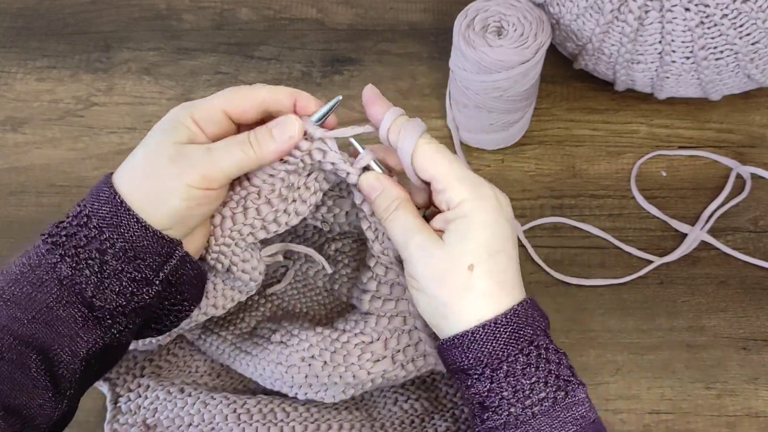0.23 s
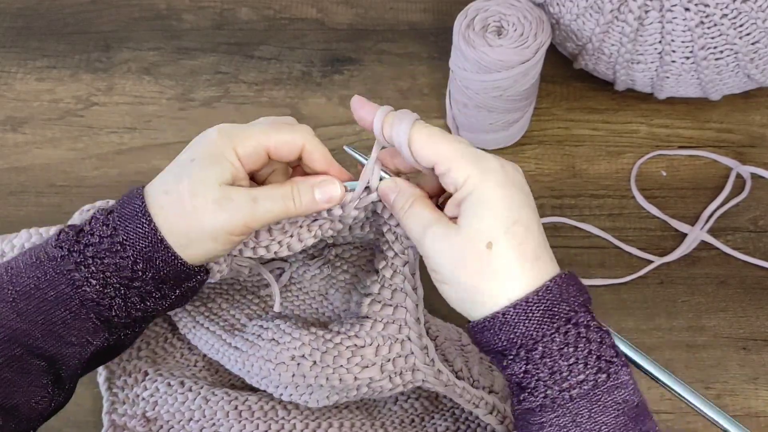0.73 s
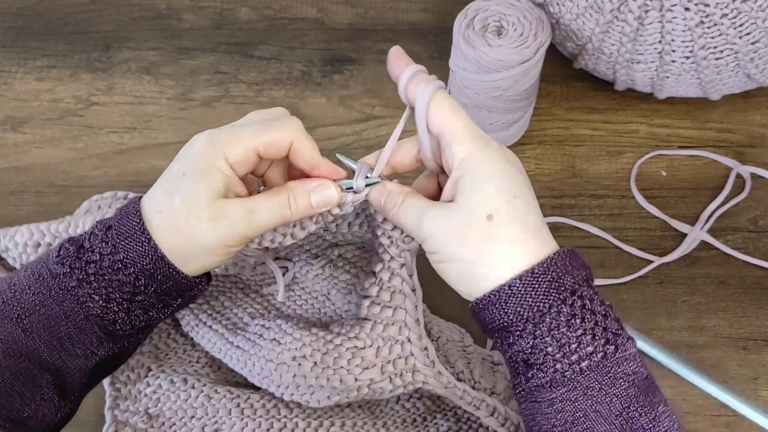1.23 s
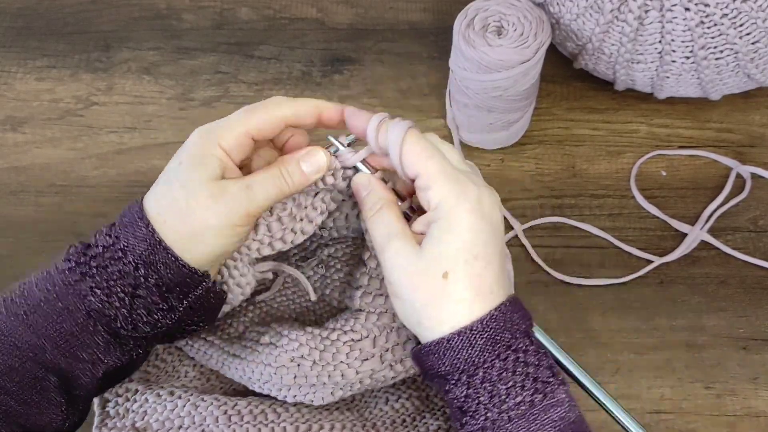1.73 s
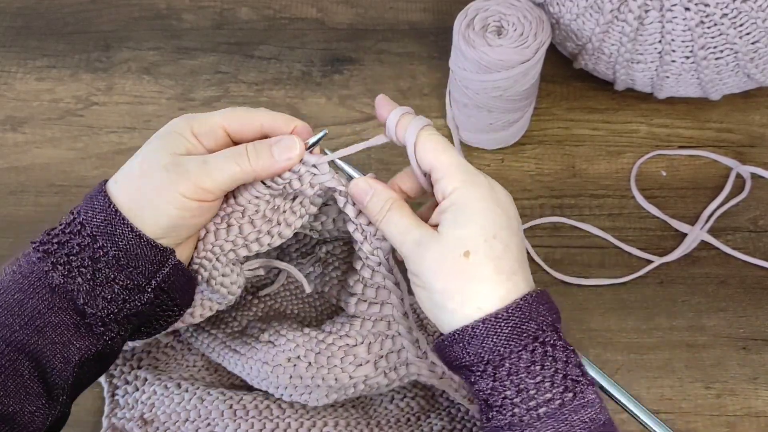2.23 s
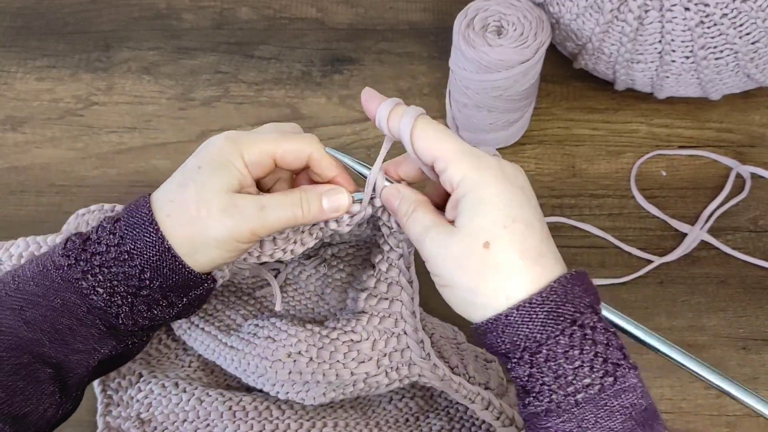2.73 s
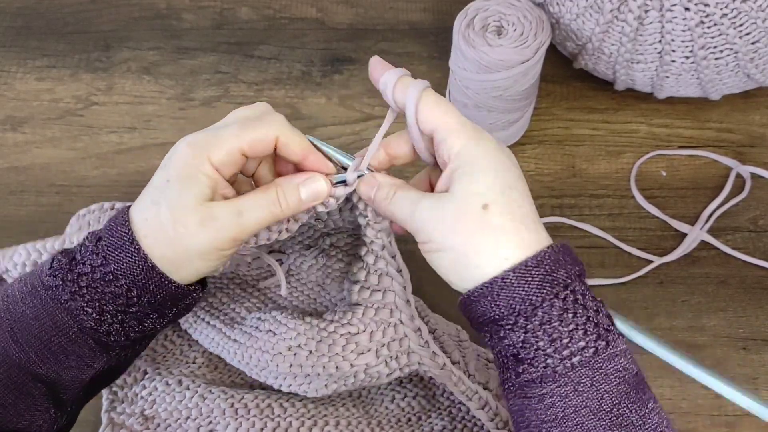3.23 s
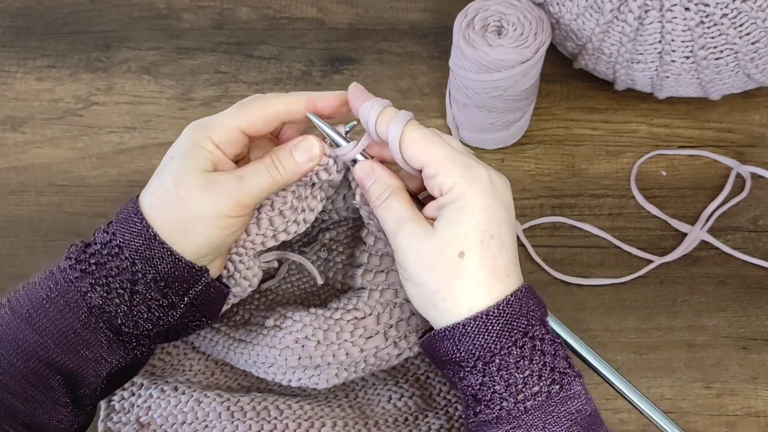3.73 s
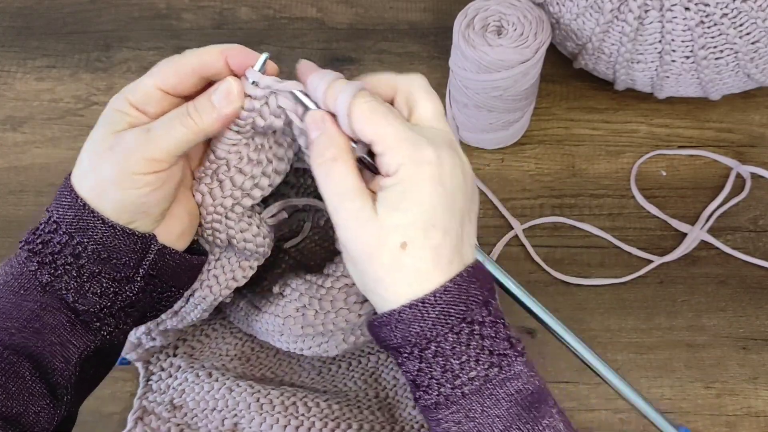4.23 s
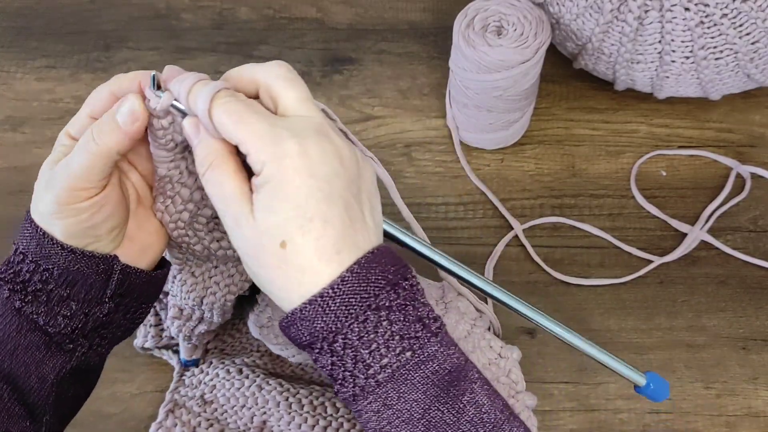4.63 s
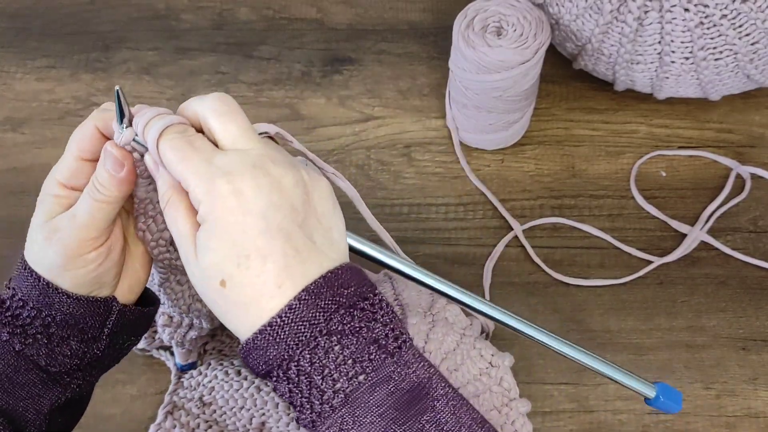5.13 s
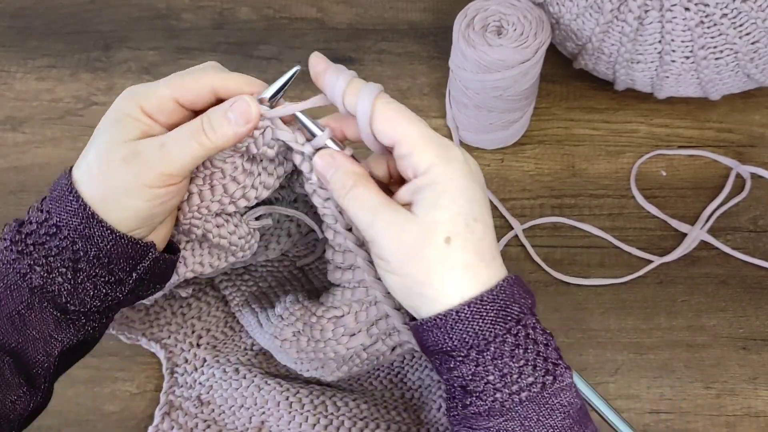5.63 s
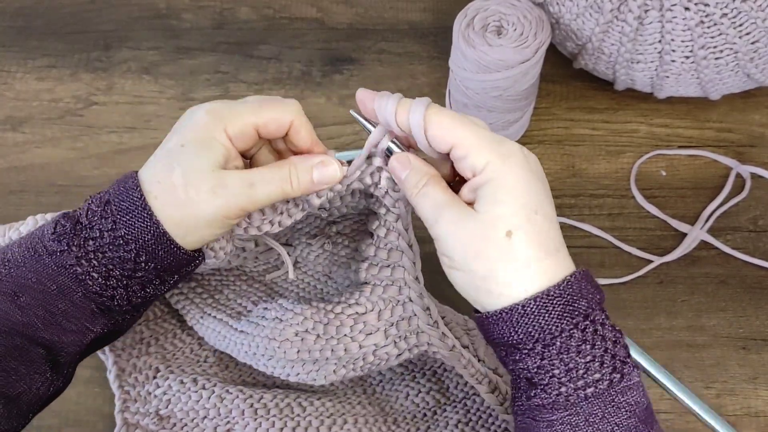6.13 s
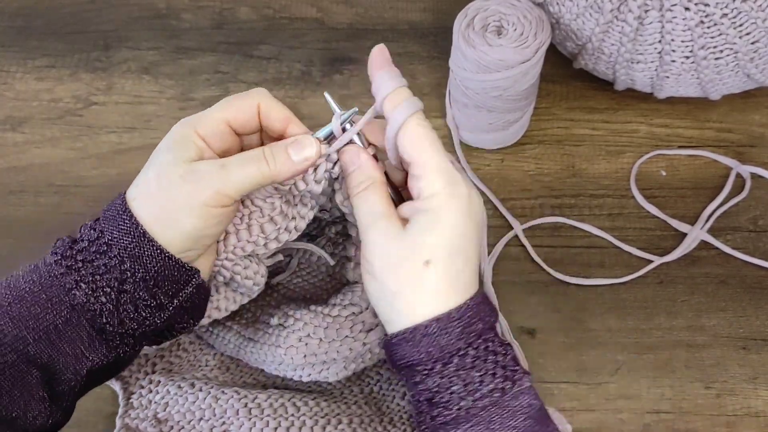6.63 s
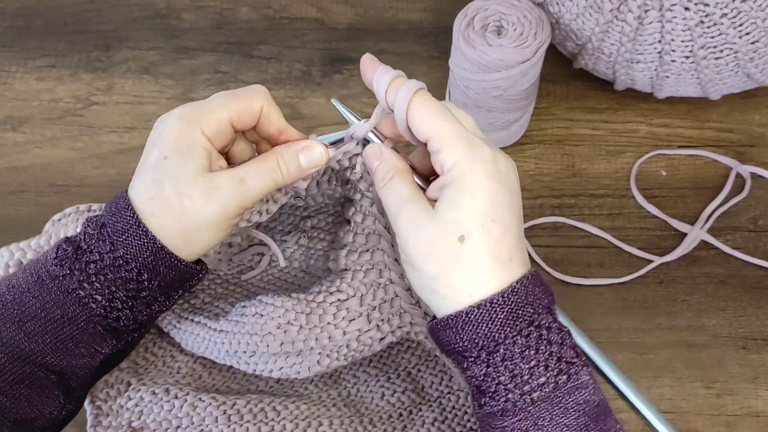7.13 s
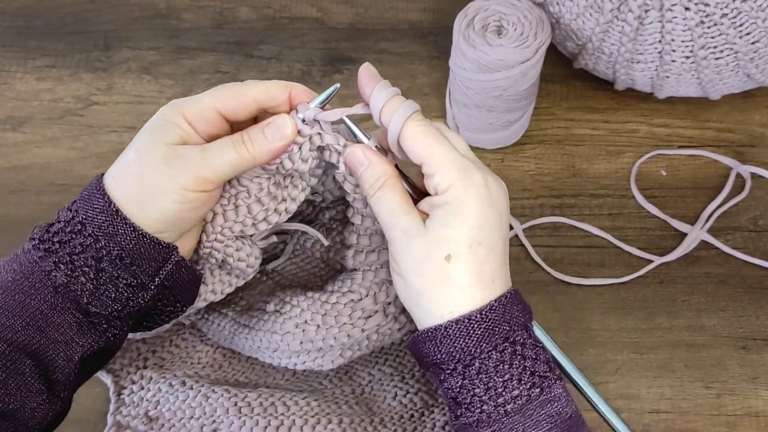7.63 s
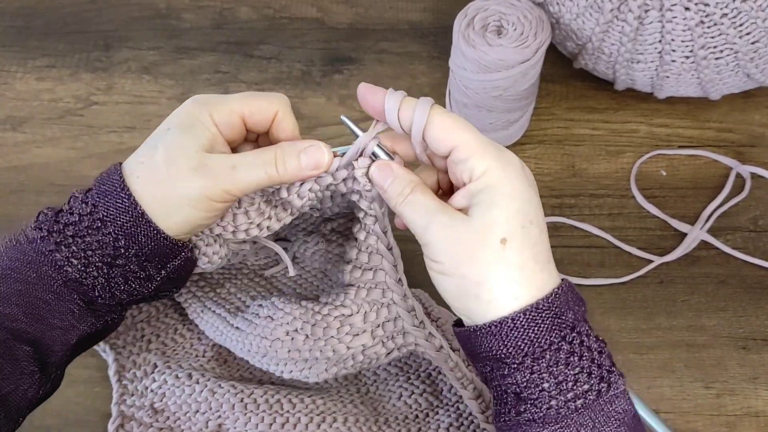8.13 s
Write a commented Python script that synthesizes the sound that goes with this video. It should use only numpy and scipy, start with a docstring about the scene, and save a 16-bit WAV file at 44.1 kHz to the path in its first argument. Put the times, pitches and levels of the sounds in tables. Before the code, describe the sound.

Metal knitting needles and thick yarn are heard close up in a quiet room. The needle tips meet in short, bright, irregular ticks, each with a slight hollow ring and a brief room tail. Sharp ones land at about 0.5, 1.5, 2.4 and 3.5 seconds, with fainter taps between. From the start, yarn drags over the metal in soft, grainy swells of high hiss, above a faint low rustle of fabric and a few very soft bumps on the table. Around 4 seconds the ticks thin out while the yarn keeps sliding. Lighter clicks return near 5 seconds, one rings slightly at 5.5, and others follow at 6.2 and, more sharply, 7.1. The hardest click falls at 8 seconds, with a smaller one at 8.4. Faint, steady room noise lies underneath.

```python
"""Hollow metal knitting needles and thick yarn, close to two microphone ports in a quiet room.
From the start, pulls of yarn hiss by stick-slip friction over the low rustle of fabric on a table.
Impacts of the tips ring the tubes, reflect off the table and fade in the room, sharply at 0.5 and 2.4 s.
Around 4 s the ticks thin out while the yarn slides on; they return, and the hardest falls at 8 s.
Throughout, each port adds its own sharp treble resonance."""
import sys
import numpy as np
from scipy import signal
from scipy.fft import rfft, irfft
from scipy.io import wavfile
from scipy.ndimage import uniform_filter1d

SR = 44100
rng = np.random.default_rng(int(sys.argv[2]) if len(sys.argv) > 2 else 0)


def file_out(sig):
    """Save sig as 16-bit WAV at sys.argv[1]."""
    # one column per channel
    cols = np.atleast_2d(sig).T
    # limit, then scale
    lim = np.clip(cols, -1, 1)
    pcm = np.round(lim * 32767).astype(np.int16)
    wavfile.write(sys.argv[1], SR, pcm)


N = 370440
T = np.arange(N) / SR

# Frequency response of each microphone port: frequency_hz, gain_db
LEFT_PORT_RESPONSE = [(60, 5), (250, 3), (1200, -0.5), (3000, 7), (5000, 4.5), (7200, 8), (8200, 14.5),
                      (8800, 18), (9400, 5.5), (10400, 1.5), (12800, -9.5), (15000, -16)]
RIGHT_PORT_RESPONSE = [(60, 2.5), (250, -1.5), (1200, -2), (3000, 8.5), (5000, 9.5), (6500, 14),
                       (7100, 20.5), (7350, 20), (7520, 25), (7750, 19), (8100, 13.5), (9100, 10.5),
                       (10400, -4), (12800, -6), (15000, -20.5)]


def needle_ticks(size=2048):
    """Image source: each tick arrives directly and off the table. Returns that pair and the room feed."""
    # Needle contacts: start_s, level_db, left_minus_right_db, rattle_ms, knock_db, at_3500_hz_db,
    # at_4400_hz_db, at_5600_hz_db, glint_db, room_db, ring_db, echo_db
    contacts = [(0.121, -27.5, 12, 0.43, -17, -15, -15, -16, 4, -5, -34, -12),
                (0.2232, -33.5, -21, 0.32, 3, 6, -9, 4, -10, -5, -32, -10),
                (0.262, -34, 1, 0.35, 19, 2, -4, -4, -10, -3, -34, -10),
                (0.288, -39, 0, .3, 18, 4, -4, -4, -10, -8, -34, -10),
                (0.3345, -21, 4, 0.64, -16, -24, -24, -17, -15, -27, -36, -12),
                (0.5034, -7.5, -8.5, 0.73, -3, -2.5, -2, 1, 5.5, -1, -20, -5.5),
                (0.6328, -14, -4, .5, -4, -3.5, -2, -7, -12, -5, -20, -9),
                (0.748, -29.5, -9, .55, -4, 2, 10, 11, -20, -9, -34, -12),
                (0.9285, -33.5, -10, .5, -14, -8, -4, -4, -2, -15, -34, -10),
                (0.9488, -28.5, -5, 0.42, -7, -3, -1, 2, -11, 0, -44, -12),
                (1.4655, -11, -9, .5, -5, -4.5, -5, -3, -1, -7.5, -30, -9),
                (1.715, -28, 0, 0.32, 4, 3, 3, -3, 2, -1, -34, -10),
                (1.7427, -37, 1, .5, 0, -5, -5, -2, -3, -12, -34, -10),
                (2.4277, -3.5, 2.5, .3, -15, -7.5, -12, -8, 6, -5.5, -42, -9),
                (2.4915, -19, -8, 0.33, -10, 0, 1, -1, -17, -6, -38, -12),
                (2.4924, -18.5, -3, 0.28, -16, 0, -3, -3, -17, -5, -38, -12),
                (2.6627, -19.5, 0.5, 0.51, 2.5, 6, -3, -2, 0, -7, -37, -8),
                (3.13, -39, -2, .3, 5, 5, 5, 3, -10, -8, -34, -12),
                (3.203, -42, 0, .3, 7, 5, 5, 3, -10, -8, -34, -12),
                (3.48, -13, -8.5, 0.69, 4, 2, -1, -1, 7, -3.5, -46, -9),
                (3.749, -35, 14, 1, -9, -17, -17, -11, -4, -4, -28, -10),
                (3.895, -37, -2, .4, -10, -10, -10, -5, 0, -6, -34, -10),
                (4.821, -36, -5, .3, 0, 8, 8, 6, -10, -8, -34, -12),
                (4.9237, -34, -13, 0.51, 16, 18, 9, 15, -7, -21, -34, -12),
                (4.9312, -20, -5.5, 0.56, 18.5, 16.5, 11, 11, -10, -15.5, -34, -14),
                (5.0843, -21, -9.5, 0.476, -7, -6, -4, 4, -7, -4, -40, -10),
                (5.5386, -17, -13, .6, -10, -9, -15, -20, -6, -4, -6, -8),
                (6.1727, -17.5, -10, .6, 4, 3.5, 6, 0, -3, -7.5, -18, -14),
                (7.0671, -9.5, -9.5, .5, 1.5, -3, -2, 1, 3.5, -4, -23, -17),
                (7.36, -26, -3, .5, -5, 4, 10, 15, 4, -5, -30, -10),
                (8.0215, -1.5, 6, 0.68, -17.5, -7, -19, -8, 3, -6, -31.5, -11),
                (8.227, -36, -6, 0.54, 10, -3, -1, 0, -18, 0, -32, -10),
                (8.387, -16, -5.5, .5, 2, 7, 6, -5, 4, -5, -34, -10)]
    # Treble snap of every contact, the reference for knock_db to glint_db: frequency_hz, gain_db
    snap = [(6400, -2.5), (7500, 0), (8400, 0.5), (9400, 0)]
    table_echo_ms, left_lag_ms, snap_ms = 3.7, 0.14, 0.41
    ports = minimum_phase(LEFT_PORT_RESPONSE), minimum_phase(RIGHT_PORT_RESPONSE)
    near, room_feed = np.zeros((2, N + 2 * size)), np.zeros(N + 2 * size)
    for contact, noise in zip(contacts, rng.standard_normal((len(contacts), 3, size))):
        start_s, level_db, pan_db, rattle_ms, knock_db = contact[:5]
        low_db, mid_db, high_db, glint_db, room_db, ring_db, echo_db = contact[5:]
        # A thin tube radiates little bass and is weak near 2.8 kHz; grip and point of impact set the rest.
        spectrum = [(400, knock_db - 26), (1000, knock_db - 6), (2100, knock_db - 6), (2800, low_db - 6),
                    (3500, low_db), (4400, mid_db), (5600, high_db), *snap, (11500, glint_db)]
        colour = minimum_phase(spectrum, size=256)
        force = tip_chatter(rattle_ms, noise)
        tick = np.convolve(force[:256], colour)
        tick = np.pad(tick, (0, size - len(tick)))
        tick += undb(ring_db) * tube_ring(force[:256], size)
        tick += np.linalg.norm(force) * dull_knock(rattle_ms, knock_db, noise[2])
        onset, lag = int(start_s * SR), int(left_lag_ms * SR / 1000)
        echo = int((table_echo_ms + 0.24 * noise[1, 0]) * SR / 1000)
        for side, start, side_db in ((0, onset + lag, pan_db / 2), (1, onset, -pan_db / 2)):
            # Level counts the energy behind the port as if gathered into snap_ms.
            energy = np.sum(np.convolve(tick[:256], ports[side][:256]) ** 2)
            direct = tick * undb(level_db) / np.sqrt(energy / (snap_ms * SR / 1000))
            near[side, start:start + size] += undb(side_db) * direct
            near[side, start + echo:start + echo + size] += undb(side_db + echo_db) * direct
            # The room blurs the rattle and keeps only the colour of the blow.
            blurred = colour * np.linalg.norm(direct) / np.linalg.norm(colour)
            room_feed[onset:onset + 256] += undb(room_db) * blurred / 2
    return near[:, :N], room_feed[:N]


def tip_chatter(rattle_ms, noise):
    """Impact and rebound: the tips rattle around one hard contact, then skid together once more."""
    rebound_ms, crossover_hz = 0.67, 5900
    samples = np.arange(noise.shape[1])
    t_ms = 1000 * samples / SR
    age = t_ms / rattle_ms
    rattle = 0.83 * noise[0] * age * np.exp(1 - age)
    impact = samples == int(rattle_ms * SR / 1000)
    rebound = 0.16 * noise[1] * np.exp(-((t_ms - rattle_ms - rebound_ms) / 0.69) ** 2)
    chatter = rattle + impact + rebound
    # Only the treble rattles; below the crossover the blow is one dispersed pulse.
    highpass, lowpass = (signal.butter(4, crossover_hz, kind, fs=SR, output="sos")
                         for kind in ("high", "low"))
    body = signal.sosfilt(lowpass, bending_pulse(rattle_ms, noise[2, ::-1]))
    return signal.sosfilt(highpass, chatter) + body * np.linalg.norm(chatter)


def bending_pulse(delay_ms, noise):
    """Dispersion: bending waves carry all frequencies equally strongly, but the low ones arrive late."""
    lag_at_1500_hz_ms, slice_hz = 1.224, 250
    hz = np.arange(len(noise) // 2 + 1) * SR / len(noise)
    scatter = np.interp(hz / slice_hz, np.arange(len(noise)), np.abs(noise))  # each slice has its own lag
    bending_ms = lag_at_1500_hz_ms * np.sqrt(1500 / np.maximum(hz, 500))
    group_delay_s = (delay_ms * (0.5 + scatter) + bending_ms) / 1000
    return irfft(np.exp(-2j * np.pi * np.cumsum(group_delay_s) * hz[1]))


def tube_ring(force, size):
    """Modal vibration: the blow excites the hollow needle's modes, each a damped sinusoid."""
    # Modes of the tube: pitch_hz, level_db, t60_s
    modes = [(800, -18, 0.027), (3750, -14, 0.012), (4870, -15, .012), (5820, -11, 0.024), (7500, -15, .02),
             (7690, -14, 0.018)]
    pitch_hz, level_db, t60_s = (column[:, None] for column in np.transpose(modes))
    t = np.arange(size) / SR
    response = np.sum(undb(level_db) * np.sin(2 * np.pi * pitch_hz * t) * 1000 ** (-t / t60_s), axis=0)
    return np.convolve(force, response)[:size]


def dull_knock(rise_ms, knock_db, noise, decay_ms=12.7):
    """Damped vibration: the blow rumbles on through yarn and fingers and dies exponentially."""
    t_ms = 1000 * np.arange(len(noise)) / SR
    rumble = noise * np.minimum(t_ms / rise_ms, 1) * np.exp(-t_ms / decay_ms)
    spectrum = [(300, knock_db - 20), (900, knock_db), (2100, knock_db), (4500, knock_db - 20)]
    knock = np.convolve(rumble, minimum_phase(spectrum, size=256))[:len(noise)]
    return undb(-1.5) * knock / np.linalg.norm(rumble)


def yarn_friction():
    """Stick-slip friction: yarn dragged over metal gives a grainy hiss above a duller rustle."""
    # Level of the top treble band near 14 kHz, flickering in and out: time_s, gain_db
    top_band_levels = [(0, 4), (.35, 0), (.6, 3), (.95, 2), (1.05, -2), (1.18, 15), (1.35, -7), (1.62, 6),
                       (1.9, -12), (2.1, 3), (2.28, 10), (2.5, 4), (2.75, -14), (2.95, 2), (3.12, -10),
                       (3.25, 9), (3.42, -4), (3.6, 4), (4.0, 4), (4.2, -3), (4.55, -12), (4.66, 3),
                       (4.78, -5), (4.98, -12), (5.25, 9), (5.6, -1), (5.75, -14), (6.0, -7), (6.24, 5),
                       (6.35, -8), (6.5, 7), (6.85, 10), (6.95, -11), (7.2, 12), (7.45, -3), (7.78, 8),
                       (7.92, -2), (8.2, -8), (8.4, -8)]
    top_hz, top_width_hz = 14360, 2360
    hiss_db, rustle_db = yarn_pulls()
    catch = np.clip((hiss_db + 49) / 14, 0, 1)  # the harder the pull, the more the yarn catches
    drag = undb(hiss_db + 0.76 * walk(60) + 1.03 * walk(400) + 1.6 * catch * walk(200))
    slips = fibre_slips(catch)
    flicker = undb(np.interp(T, *np.transpose(top_band_levels)) + 2.8 * walk(25))
    top_band = flicker * steep_band(slips, top_hz, top_width_hz)
    hiss = slips - 0.46 * band(slips, top_hz + 1200, width_hz=4400)  # the hiss stops short of the top
    rustle = unit(band(rng.standard_normal((2, N)), hz=2500, width_hz=4800))
    rub = undb(-15.5 + 4.4 * walk(120)) * catch * unit(band(hiss, hz=5130, width_hz=7300))
    port_energy = [np.sum(minimum_phase(port) ** 2) for port in (LEFT_PORT_RESPONSE, RIGHT_PORT_RESPONSE)]
    port_gain = np.sqrt(np.mean(port_energy) / 2)  # what the ports will add to a hiss
    return drag * (hiss + top_band + rub + undb(rustle_db) * rustle) / port_gain


def yarn_pulls():
    """Amplitude envelope: each pull swells from rest and sinks back; the strongest sets the levels."""
    # Pulls along the needles, rustle relative to hiss: peak_s, peak_db, rise_s, fall_s, peak_rustle_db
    pulls = [(0.122, -43.5, 0.12, 0.14, -14), (0.092, -42, 0.017, .05, -16), (0.3, -44.5, 0.16, 0.25, -8),
             (0.33, -37.5, 0.025, 0.017, -22), (0.575, -53, 0.63, .10, -7), (0.57, -47, .06, .05, -8),
             (0.597, -43, .02, .016, -3), (0.762, -45.5, 0.048, 0.078, 0.5),
             (0.965, -47, 0.13, 0.13, -11.5), (1.075, -53.5, .02, .05, -4), (1.185, -46.5, 0.13, 0.18, -10),
             (1.403, -50, 0.1, 0.1, -3.5), (1.5, -52.5, .05, .1, -4), (1.661, -42, 0.032, 0.051, -6.5),
             (1.78, -44.5, 0.043, 0.065, -9.5), (2.051, -44, 0.11, 0.24, -12.5),
             (2.16, -43.5, 0.17, 0.21, -13), (2.22, -46, .08, .06, -9), (2.285, -45, 0.18, 0.071, -10.5),
             (2.31, -48, .05, .025, -10), (2.41, -43.5, 0.037, .11, -15), (2.49, -47, 0.023, 0.09, -1.5),
             (2.83, -53, .08, .04, -6), (2.915, -46.5, 0.0074, .05, -11), (2.933, -44.5, 0.03, 0.12, -9.5),
             (3.04, -48, 0.11, 0.068, -14), (3.251, -49, 0.16, 0.079, -11),
             (3.45, -47.5, 0.095, 0.31, -7.5), (3.612, -46, 0.077, 0.18, -13), (3.70, -49, .05, .04, -11),
             (3.751, -45, 0.1, 0.047, -11), (3.895, -47, 0.13, .04, -12), (3.98, -41, 0.025, 0.18, -19),
             (3.99, -47.5, 0.23, 0.3, -11.5), (4.07, -47, .1, .12, -11), (4.135, -48, .08, .09, -11),
             (4.284, -48, 0.051, 0.032, -9), (4.334, -54.5, 0.044, 0.071, -1.5), (4.39, -53, .15, .15, -3),
             (4.48, -52, 0.12, 0.12, -2), (4.564, -50, 0.06, 0.07, -7), (4.682, -51, .008, .04, -13),
             (4.693, -42.5, 0.0058, .012, -16), (4.71, -40, 0.016, 0.035, -21),
             (4.737, -46, .01, 0.035, -12), (4.77, -44.5, 0.035, 0.03, -11),
             (4.824, -40.5, 0.1, 0.031, -16), (4.91, -52, .008, 0.026, -3), (4.925, -52.5, .03, 0.23, -3),
             (5.06, -51.5, .1, .06, -6), (5.16, -49, .1, .1, -9), (5.275, -43, 0.26, 0.094, -13),
             (5.32, -44, 0.11, 0.037, -10.5), (5.446, -46, 0.031, 0.069, -9.5),
             (5.563, -39, 0.022, .02, -14), (5.579, -36.5, 0.034, 0.036, -21),
             (5.619, -39.5, 0.071, 0.088, -23), (6.01, -50, 0.096, 0.27, -2.5), (6.25, -52, 0.11, 0.088, 2),
             (6.461, -40, 0.047, 0.068, -9), (6.661, -43.5, 0.057, 0.13, -13.5),
             (6.842, -46.5, 0.29, 0.06, -13.5), (7.058, -50, 0.16, 0.61, -5.5),
             (7.361, -41, 0.061, 0.087, -13), (7.43, -45.5, .12, .1, -9), (7.415, -45.5, .03, .05, -8),
             (7.47, -44, 0.24, 0.07, -16.5), (7.505, -42, .12, .035, -15), (7.59, -42, 0.11, 0.06, -14),
             (7.612, -43, .05, .028, -7.5), (7.68, -50.5, 0.049, .04, -8), (7.778, -39.5, .045, 0.087, -15),
             (7.88, -46.5, .02, .04, -8), (7.8, -41, 0.15, 0.15, -13.5),
             (7.924, -41.5, 0.046, 0.032, -10.5), (8.052, -38.5, 0.089, 0.083, -11),
             (8.1, -44.5, .08, 0.11, -5), (8.14, -46, .025, .05, -2), (8.229, -55.5, 0.065, 0.034, 0.5)]
    rest_db, rest_rustle_db, roundness = -61.0, -3.0, 1.265  # a roundness of 1 gives a pointed swell
    hiss_db, rustle_db = np.full(N, rest_db), np.full(N, rest_rustle_db)
    for peak_s, peak_db, rise_s, fall_s, peak_rustle_db in pulls:
        away = np.where(T < peak_s, (peak_s - T) / rise_s, (T - peak_s) / fall_s)
        swell = 1 - np.minimum(away, 1) ** roundness
        pull_db = rest_db + swell * (peak_db - rest_db)
        pull_rustle_db = rest_rustle_db + swell * (peak_rustle_db - rest_rustle_db)
        rustle_db = np.where(pull_db > hiss_db, pull_rustle_db, rustle_db)
        hiss_db = np.maximum(pull_db, hiss_db)
    return hiss_db, rustle_db


def fibre_slips(catch):
    """Shot noise: thousands of fibres slip each second, and in a hard pull single ones snap free."""
    slip_ms, unevenness_db, snags_per_s = 0.33, 1.54, 400
    slip_samples = int(slip_ms * SR / 1000)
    noise = rng.standard_normal((2, N))
    slip_db = unevenness_db * np.repeat(rng.exponential(size=N), slip_samples)[:N]  # same at both ports
    snags = (rng.random(N) < catch * snags_per_s / SR) * rng.standard_normal(N) * undb(3)
    slips = unit(noise * undb(slip_db)) + snags
    return unit(slips - 0.95 * band(slips, hz=2600, width_hz=7100))  # fine fibres scratch high


def fabric_shifts():
    """Modulated band noise: hands and heavy fabric shift on the table with rustle, thump and rumble."""
    # Movements, thump and rumble relative to rustle: time_s, rustle_db, thump_db, rumble_db
    shifts = [(0.0, -69, 8, 18.5), (0.3, -53, -11, 1.5), (0.62, -51.5, 3.5, -5), (0.9, -56, -4, 0),
              (1.25, -57.5, 6.5, 4), (1.55, -52, -5, 0), (1.8, -55.5, 0, 1), (2.1, -55.5, 2, -7),
              (2.6, -65, 4, 8.5), (3.1, -57, 1, 1), (3.7, -61, -6, 10), (4.25, -52, -3, 4),
              (4.65, -60.5, 8, 10), (5.0, -59, 5.5, 5), (5.3, -51, -9, -6), (5.6, -60.5, 6, -3),
              (6.3, -55, -3.5, 0.5), (6.7, -54.5, -1, -5), (7.1, -60, 6, -3), (7.9, -53, -6.5, -2.5),
              (8.4, -57, -1, -1)]
    time_s, rustle_db, thump_db, rumble_db = np.transpose(shifts)
    out = 0
    for hz, level_db in ((290, rustle_db), (115, rustle_db + thump_db), (36, rustle_db + rumble_db)):
        mid, side = unit(steep_band(rng.standard_normal((2, N)), hz, width_hz=1.66 * hz))
        swell = undb(np.interp(T, time_s, level_db) + 2.15 * walk(7.6))
        out = out + swell * stereo(0.48 * mid, 0.4 * side)
    return out


def table_bumps():
    """Soft impact: hands and fabric meet the table slowly, so each bump is a swell of low noise."""
    # Bumps: middle_s, length_s, pitch_hz, level_db
    bumps = [(1.461, 0.17, 200, -52), (1.565, 0.19, 305, -55.5), (1.7, 0.1, 219, -53.5),
             (4.15, .1, 187, -57), (4.279, 0.1, 272, -55.5), (4.379, 0.08, 262, -52.5),
             (4.581, 0.21, 126, -58), (4.98, 0.067, 123, -52), (5.306, 0.11, 350, -54.5)]
    size, lead_s = SR // 2, 0.25
    t = np.arange(size) / SR - lead_s
    out = np.zeros((2, N))
    for middle_s, length_s, pitch_hz, level_db in bumps:
        mid, side = unit(steep_band(rng.standard_normal((2, size)), pitch_hz, width_hz=0.45 * pitch_hz))
        swell = np.exp(-2 * (t / (length_s / 2)) ** 2)
        start = int((middle_s - lead_s) * SR)
        out[:, start:start + size] += undb(level_db) * swell * stereo(mid, 0.4 * side)
    return out


def room_reverberation(size=22050):
    """Diffuse field: two unrelated noise tails of unit energy, each band decaying at its own rate."""
    # Reverberation time: frequency_hz, t60_s
    decay_times = [(1500, 0.46), (3000, 0.17), (3700, 0.29), (5000, 0.28), (7500, 0.27), (14000, 0.25)]
    # Colour of the reflections: frequency_hz, gain_db
    colour = [(1000, -0.5), (2400, 3.5), (3600, 4), (5500, -0.5), (7500, -1), (14000, 2)]
    t, tail = np.arange(size) / SR, 0
    early_boost = 1 + 0.55 * np.exp(-t / 0.0061)  # nearby things answer louder at first
    for hz in 1000 * 2 ** np.arange(0, 4.1, 0.5):  # half octaves, 1 to 16 kHz
        fade = 1000 ** (-t / read_curve(decay_times, hz)) * early_boost
        noise = band(rng.standard_normal((2, size)), hz, width_hz=hz / 2)
        tail = tail + noise * fade * undb(read_curve(colour, hz))
    tail *= np.clip(t / 0.004 - 0.5, 0, 1)  # the first walls answer after a few ms
    tail *= undb(2.5 * walk(370)[:size] * np.exp(-t / 0.049))  # early echoes come in lumps
    return tail / np.sqrt(np.sum(tail ** 2, axis=1, keepdims=True))


def background_noise():
    """Partial coherence: steady noise and slowly swelling distant rumble, a little alike in the bass."""
    # Steady background noise, cut off above about 13 kHz: frequency_hz, relative_density_db
    noise_spectrum = [(15, 5.5), (35, -10), (80, -19.5), (200, -11), (530, -17.5), (1200, -20),
                      (2700, -35.5), (6000, -41.5), (9000, -47), (12300, -27.5), (13500, -82), (17000, -72)]
    level_db = -49.5
    hz = np.arange(N // 2 + 1) * SR / N
    shared, own = rfft(rng.standard_normal(N)), rfft(rng.standard_normal((2, N)))
    coherence = 0.23 * 500 / (500 + hz)
    spectrum = np.sqrt(coherence) * shared + np.sqrt(1 - coherence) * own
    spectrum *= undb(read_curve(noise_spectrum, hz))
    steady, rumble = irfft(spectrum, N), irfft(spectrum * (hz < 700), N)
    return undb(level_db) * (steady + rumble * (undb(walk(1.98)) - 1)) / np.std(steady)


def undb(db):
    """Decibels as an amplitude ratio."""
    return 10 ** (np.asarray(db) / 20)


def unit(x):
    """Normalisation to an RMS of 1."""
    return x / np.sqrt(np.mean(x ** 2))


def stereo(mid, side):
    """Sum and difference give left and right."""
    return np.array([mid + side, mid - side])


def band(x, hz, width_hz):
    """One resonance, gain 1 at the centre."""
    return signal.lfilter(*signal.iirpeak(hz, hz / width_hz, SR), x)


def steep_band(x, hz, width_hz):
    """Two equal resonances in cascade."""
    return band(band(x, hz, width_hz), hz, width_hz)


def walk(rate_hz):
    """Random modulation: levels held for 1 / rate_hz seconds and smoothed twice, RMS 1."""
    hold = int(SR / rate_hz)
    steps = np.repeat(rng.standard_normal(N // hold + 1), hold)
    return unit(uniform_filter1d(uniform_filter1d(steps, hold), hold)[:N])


def read_curve(points, hz):
    """Interpolation of (frequency_hz, value) points on a log-frequency axis."""
    frequency_hz, values = np.transpose(points)
    return np.interp(np.log(np.maximum(hz, 1)), np.log(frequency_hz), values)


def minimum_phase(points, size=1024):
    """Causal impulse response of a (frequency_hz, gain_db) curve, by folding its cepstrum."""
    hz = np.arange(size + 1) * SR / (2 * size)
    cepstrum = irfft(read_curve(points, hz) * np.log(10) / 20)
    cepstrum[1:size] *= 2
    cepstrum[size + 1:] = 0
    return irfft(np.exp(rfft(cepstrum)))[:size]


def scene():
    """Superposition: ticks, their reverberation, yarn, fabric and background add at the two ports."""
    ticks, room_feed = needle_ticks()
    reverberation = signal.fftconvolve(room_feed[None], room_reverberation(), axes=1)[:, :N]
    return ticks + reverberation + yarn_friction() + fabric_shifts() + table_bumps() + background_noise()


def record(dry):
    """Resonance and gain control: each port rings; loud ticks duck the gain and clip; the top is cut."""
    threshold, depth, attack_s, release_s = 0.11, 0.023, 0.0034, 0.11
    ceiling, cutoff_hz = 0.84, 15500
    ports = np.array([signal.fftconvolve(channel, minimum_phase(response))[:N]
                      for channel, response in zip(dry, (LEFT_PORT_RESPONSE, RIGHT_PORT_RESPONSE))])
    excess = np.maximum(np.abs(ports).max(axis=0) - threshold, 0)
    attack, release = np.exp(-1 / (attack_s * SR)), np.exp(-1 / (release_s * SR))
    accumulated = signal.lfilter([1], [1, -release], excess)
    duck = signal.lfilter([1 - attack], [1, -attack], accumulated)
    clipped = np.clip(ports / (1 + depth * duck), -ceiling, ceiling)
    lowpass = signal.ellip(8, 0.2, 70, cutoff_hz, fs=SR, output="sos")
    return signal.sosfilt(lowpass, clipped)


dry = scene()
out = record(dry)
file_out(out)
```